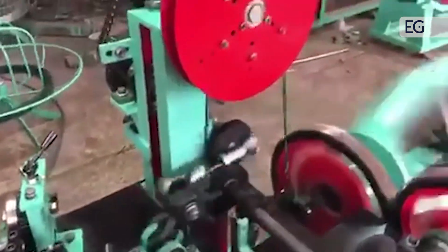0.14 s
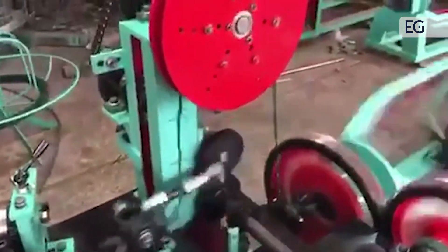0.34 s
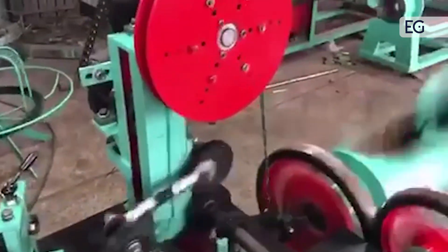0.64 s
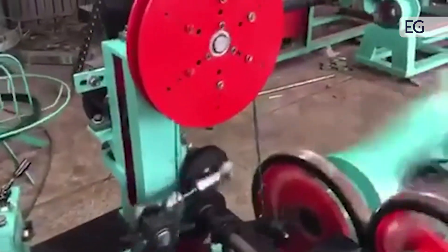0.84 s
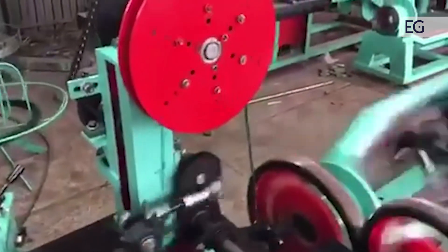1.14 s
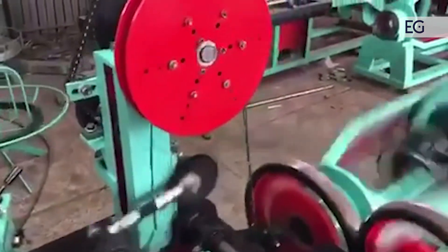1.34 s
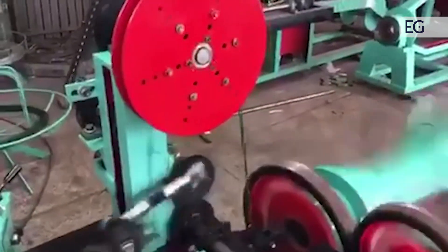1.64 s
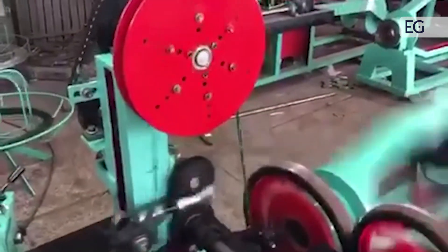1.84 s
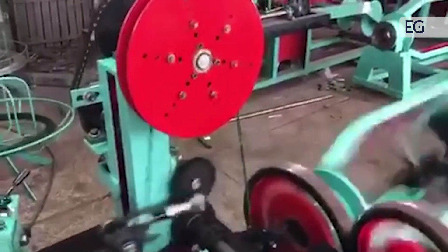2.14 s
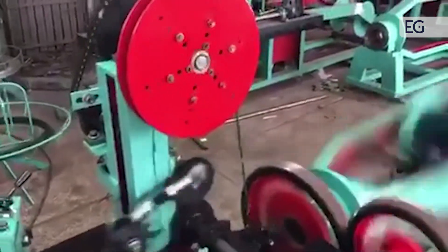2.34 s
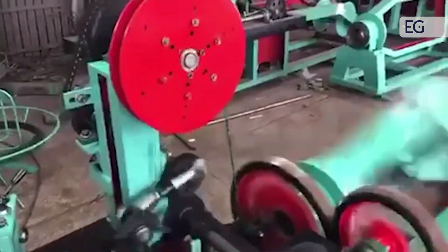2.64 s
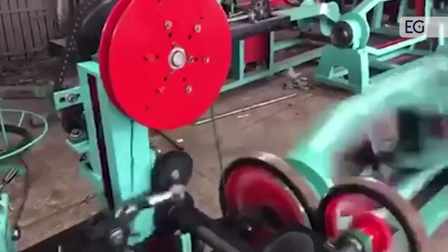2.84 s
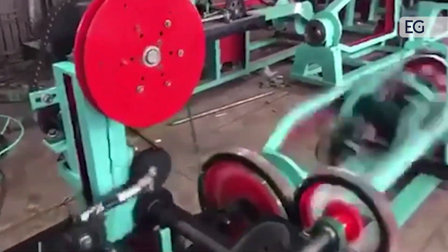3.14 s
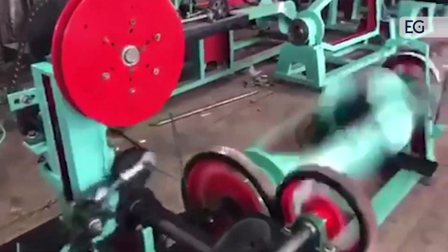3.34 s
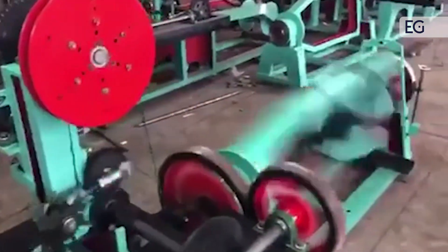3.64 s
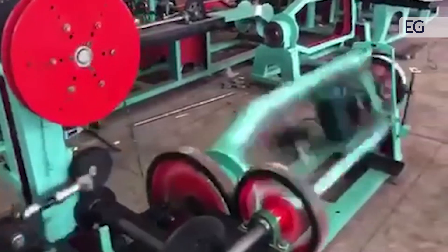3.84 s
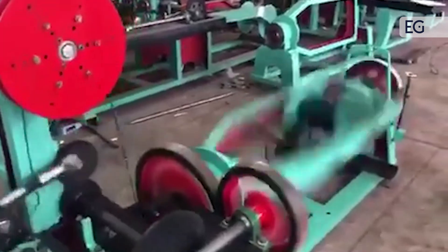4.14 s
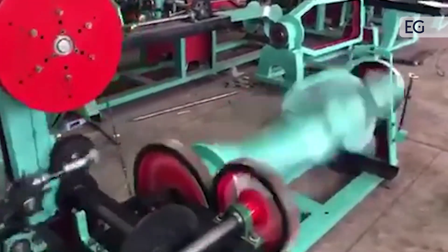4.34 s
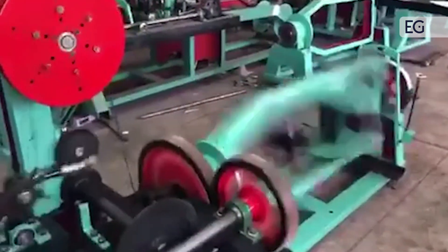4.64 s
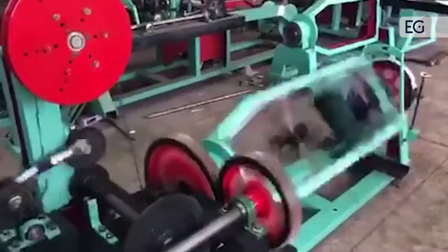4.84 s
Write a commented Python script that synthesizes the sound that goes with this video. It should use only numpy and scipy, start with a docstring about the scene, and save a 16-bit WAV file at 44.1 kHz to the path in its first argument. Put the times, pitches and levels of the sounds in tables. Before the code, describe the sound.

Continuous fast metallic clatter, heard on a phone a few metres off in a workshop: chain and gear rattle, scraping wire, knocks on sheet metal, and a regular thudding, crashing cutter stroke. Lever clanks are frequent for the first three seconds, then sparse. Thin wavering whines ring above a low motor hum; as the rattle softens with distance, a high steady whine stands out.

```python
"""In a workshop a wire machine runs at about three cycles a second, heard by a phone whose distance varies.
Driven resonance: roller rim modes and the motor hum waver as narrow-band noise, the upper modes in close pairs.
Shaped noise: dense random knocks make the rattle of frame, gears, chain, strand, barbs, guides and scraped wire;
its bands gap briefly, and short faint tones at random pitches sound during the gaps. Damped modes: guard knocks,
lever clanks and barb ticks decay as sines; each cutter stroke adds a bright noise crash and a low thud."""
import sys
import numpy as np
from scipy import signal
from scipy.fft import rfft, irfft, next_fast_len
from scipy.io import wavfile
from scipy.ndimage import uniform_filter1d

SR = 44100
rng = np.random.default_rng(int(sys.argv[2]) if len(sys.argv) > 2 else 0)


def to_wav(sig):
    """Store sig (one row per channel, or 1-D mono) as 16-bit WAV at the path in sys.argv[1].

    Samples outside -1..1 are clipped; the rate is SR.
    """
    pcm = np.clip(np.atleast_2d(sig), -1, 1) * 32767
    pcm = np.round(pcm).astype(np.int16)
    wavfile.write(sys.argv[1], SR, pcm.T)  # frames by channels


N = 219706
T = np.arange(N) / SR  # s
FFT_LENGTH = next_fast_len(N)
TOP_HZ = 10100  # upper limit of the phone

# path of the phone: start_s, distance_m
DISTANCE = [(0, 2.52), (.6, 2.1), (1.1, 2.79), (2.0, 2.53), (2.9, 2.5), (3.5, 4.16), (3.9, 4.23),
            (4.4, 4.16), (4.98, 3.7)]
NEAR_M = 2  # every near_db holds at this distance

# rim modes of the rollers, the second mode and then the first: pitch_hz, width_hz
LOW_MODES = [(2552, 18.0), (1258, 12.0)]
# upper rim modes in close pairs: pitch_hz, width_hz
UPPER_MODES = [(4169, 6), (4192.5, 4.85), (6002, 4.5), (6031, 5.5), (7936, 3.5), (7970, 7.9)]
# slow level of the second rim mode as the phone turns to the rollers: start_s, level_db
WHINE = [(0, -38.5), (.6, -37.5), (1.2, -41.5), (1.7, -32.5), (2.3, -28), (2.8, -26), (3.1, -15.5),
         (3.7, -20.5), (4.3, -21), (4.98, -19.5)]
# moments when that mode rings up or drops out: centre_s, change_db
THROBS = [(.054, 13.5), (.26, -7), (.471, 13), (.572, 7), (.753, 13), (.837, 5), (1.038, 8), (1.108, 14),
          (1.485, 9), (1.602, 9), (1.657, -17), (1.721, 11), (1.831, -14), (2.026, 9.5), (2.174, 7),
          (2.244, 9), (2.323, -4), (2.431, 6.5), (2.64, -44), (2.722, 10), (2.87, 4), (2.97, -14),
          (3.047, 3), (3.152, -2.5), (3.19, -14), (3.44, -16), (3.572, -14), (3.654, 4), (3.775, -15),
          (3.861, -22), (4.005, -8.5), (4.058, 0), (4.266, -14), (4.394, -16.5), (4.597, -7.5),
          (4.672, 6.5), (4.701, -15), (4.789, -9), (4.868, 8), (4.925, -11.5)]
THROB_S = 0.012
# steady ring of the first rim mode: near_db, loss_db (per doubling of distance)
FIRST_RING = (-32, 6.2)
# steady ring of each upper mode: near_db, loss_db (per doubling of distance)
UPPER_RING = [(-38.5, 0.5), (-35.5, 8.1), (-35, 19), (-44.5, 5.6), (-49.5, 12), (-51, 4.7)]
# swells of the first rim mode, added in power to its steady ring: top_s, level_db
FIRST_SWELLS = [(1.31, -28.5), (1.78, -25.5), (2.03, -41), (2.33, -28), (3.03, -29), (3.17, -31),
                (3.88, -38), (4.11, -32.5), (4.6, -32.5)]
# such swells for each upper mode, in order: top_s, level_db
UPPER_SWELLS = [
    [(.42, -39), (.67, -30.5), (1.24, -51), (2.41, -34), (3.02, -39), (3.4, -30), (4.57, -34),
     (4.72, -28.5)],
    [(.16, -29), (1.85, -25.5), (2.11, -26.5), (2.42, -30.5), (3.4, -36), (3.57, -36), (4.96, -46)],
    [(.15, -30.5), (.7, -33), (.3, -32.5), (.9, -35.5), (1.3, -35), (2.12, -35.5), (2.97, -50), (3.34, -41),
     (3.7, -40), (4.7, -42.5), (4.88, -40)],
    [(.02, -33.5), (.85, -49), (2.01, -38), (2.44, -43), (2.95, -38.5), (3.27, -39), (4.32, -48)],
    [(.02, -45), (1.33, -39), (2.94, -60), (3.98, -48), (4.32, -53), (4.7, -47.5)],
    [(.04, -41.5), (1.3, -55), (2.97, -49.5), (4.32, -59)],
]
SWELL_RISE_S, SWELL_FALL_S = 0.052, 0.044  # before any stretch
UPPER_SWELL_STRETCH = 1.42  # the narrow upper modes build and die more slowly
# exponent on the size of the swing: 0 steady, 1 free noise
LOW_FLUTTER, FIRST_FLUTTER, UPPER_FLUTTER = 0.25, 0.55, 0.28

HUM_HZ, HUM_WIDTH_HZ = 166, 10.2
# steady motor hum: near_db, loss_db (per doubling of distance)
HUM_LEVEL = (-39.5, 2.7)
# swells of the hum, added in power: top_s, level_db
HUM_SWELLS = [(.02, -38), (.44, -34), (.8, -39), (1.14, -40), (1.5, -38.5), (1.83, -35), (2.65, -37.5),
              (3.05, -35.5), (3.27, -39), (4.32, -32), (4.88, -34.5)]

# relative spectral density of the frame's drone: pitch_hz, level_db
BODY = [(25, -36), (45, -50), (60, -27), (90, -19.5), (130, -10), (200, -8), (350, -1), (500, -3),
        (650, -9.5), (900, -93)]
# the same for the gears: pitch_hz, level_db
GEARS = [(480, -28), (600, -4.5), (800, -0.5), (1150, -3), (1330, -3.5), (1420, -62)]
# the same for the chain links: pitch_hz, level_db
CHAIN = [(1260, -49), (1340, 1), (1600, -6), (2050, -0.5), (2300, -2), (2650, -0.5), (2780, -60)]
# the same for the wire strand: pitch_hz, level_db
STRAND = [(2700, -34), (2800, -10), (2900, 4), (3300, -5.5), (3650, 2.5), (3800, -37.5)]
# the same for the barbs: pitch_hz, level_db
BARBS = [(3600, -30.5), (3750, 2.5), (4100, 5), (5000, -2), (6150, 0.5), (6350, -40.5)]
# the same for the guides: pitch_hz, level_db
GUIDES = [(6150, -20), (6280, 0), (6420, -14), (6800, -12), (6950, 2), (7250, 2), (7400, -25)]
# the same for wire scraping over the guides: pitch_hz, level_db
SCRAPE = [(7150, -32), (7300, -0.5), (8000, 2), (9000, -1), (9600, -23), (9800, -43.5), (10100, -46)]
# resonances of the steel frame over those densities: pitch_hz, width_hz, gain_db
FRAME = [(246, 14, 5), (356, 16, 3), (384, 14, 8), (414, 12, 5), (451, 12, 5), (925, 20, 4), (1039, 40, 4),
         (1232, 55, 12), (1800, 60, 5), (2553, 66, 7), (2995, 35, 6), (3125, 35, 11), (4180, 60, 9),
         (6010, 50, 9)]
# rms level of each rattling part: near_db, loss_db (per doubling of distance), shake_db (at a typical stroke)
PARTS = dict(body=(-26, 4.52, 2.4), gears=(-29, 4.3, 2.5), chain=(-29, 5.2, 4.1), strand=(-38, 5.6, 2.1),
         barbs=(-36, 5.7, 4), guides=(-52.5, 5.2, 9.2), scrape=(-44, 5, 2.1))
SHAKE_S, SHAKE_LAG_S = 0.033, 0.0051
# brief gaps in bands of the rattle, with typical falls that scatter by band: centre_s, half_length_s,
# gears_and_chain_db, strand_barbs_and_guides_db, scrape_db
GAPS = [(.07, .035, 10, 30, 14), (.265, .03, 12, 24, 6), (.405, .03, 14, 24, 8), (.615, .03, 14, 22, 5),
        (.785, .05, 22, 30, 8), (.965, .03, 14, 20, 14), (1.135, .048, 18, 28, 6), (1.32, .03, 22, 22, 6),
        (1.478, .03, 10, 32, 22), (1.66, .03, 26, 24, 18), (1.84, .05, 16, 34, 10), (2.01, .035, 16, 28, 6),
        (2.17, .045, 12, 30, 26), (2.355, .03, 14, 22, 10), (2.53, .055, 24, 32, 16),
        (2.73, .045, 20, 30, 20), (2.88, .042, 12, 28, 14), (3.07, .04, 12, 20, 8), (3.2, .025, 8, 16, 6),
        (3.39, .06, 5, 18, 8), (3.55, .03, 10, 12, 8), (3.74, .03, 6, 10, 14), (3.98, .025, 7, 3, 2),
        (4.115, .045, 11, 26, 16), (4.26, .03, 17, 14, 5), (4.48, .05, 4, 24, 12), (4.6, .03, 14, 8, 6),
        (4.77, .05, 6, 26, 12), (4.955, .03, 18, 30, 8)]
# chance that a band of each part keeps its level through a gap: probability
KEEPS_LEVEL = dict(gears=.3, chain=.2, strand=.03, barbs=.25, guides=.25, scrape=.45)
# longer drops in level of the 2.7-3.8 kHz noise: centre_s, fall_db
STRAND_DROPS = [(3.05, 10), (3.36, 22), (3.48, 22), (3.6, 22), (4.14, 14), (4.53, 12), (4.8, 14),
                (4.92, 14)]
STRAND_DROP_S = 0.07

# modes of the sheet guard: pitch_hz, t60_s
GUARD = [(760, .06), (930, .07), (1090, .07), (1480, .05), (1790, .06), (1990, .03), (2260, .04)]
KNOCKS_PER_S = 45
# rms level of the guard knocks: near_db, loss_db (per doubling of distance)
KNOCK_LEVEL = (-36.5, 4.1)

# single clanks of the lever, before a common trim: start_s, level_db
CLANKS = [(0.0343, -12), (.111, -14), (.218, -17), (0.6915, -11), (0.8093, -10), (.92, -30), (1.089, -15),
          (1.1478, -13), (1.446, -13), (1.6701, -19), (1.8781, -14), (2.031, -15), (2.174, -16),
          (2.291, -10.5), (2.401, -16), (2.564, -10), (2.6736, -7), (2.846, -9.5), (2.909, -6),
          (2.986, -10), (3.2256, -13), (3.9287, -16), (4.2852, -20), (4.6628, -20.5), (4.779, -20)]
# modes of the lever: pitch_hz, level_db, t60_s
LEVER = [(1810, -1.5, 0.04), (2073, -1.5, 0.05)]
CLANK_TRIM_DB = -5.0

TONE_LOW_HZ, TONE_HIGH_HZ, TONE_T60_S, TONE_LAG_S = 650, 5800, 0.12, 0.02
# upper limit of a faint tone at 1 kHz: near_db, loss_db (per doubling of distance), tilt_db (lost per octave)
TONE_LEVEL = (-24, 3.9, 3.1)

# cutter strokes, before the two gains below: stroke_s, crash_db, thud_db, shake (1 = typical)
CUTS = [(0.1067, -34, -35.5, 1.4), (0.465, -24, -39, 0.72), (0.818, -29, -43, 1.1), (1.148, -26.5, -35, 2),
        (1.5113, -29.5, -36, 0.48), (1.887, -54, -39, 1.2), (2.23, -42, -38, 0.99),
        (2.556, -31, -60.5, 1.2), (2.906, -54, -39, 1.2), (3.249, -25, -41.5, 0.57),
        (3.6066, -35, -49, 0.67), (3.9513, -32, -38, 0.91), (4.3044, -40, -37.5, 0.79),
        (4.64, -31, -47, 0.42)]
CRASH_GAIN_DB, THUD_GAIN_DB = 10.0, 6.0
# relative spectral density of the crash: pitch_hz, level_db
CRASH = [(500, -23), (1300, -5), (2300, -5), (2700, -22), (3600, -22), (4000, -3), (5500, -5), (6600, -12),
         (7400, -2), (8200, 4.5), (9400, -10), (9700, -40)]
STROKE_LEAD_S, STROKE_RISE_S = 0.022, 0.022

# ticks of a barb on a guide, before a common trim: start_s, level_db, pitch_hz
TICKS = [(.469, -35, 4650), (1.26, -30, 3170), (2.57, -29, 4840), (.611, -34, 7460), (1.148, -29, 7320),
         (2.554, -24, 8030), (3.066, -32, 8800), (2.715, -24, 4830), (2.849, -35, 4400), (2.904, -25, 5130),
         (3.957, -24, 5050), (4.215, -26, 3380), (4.309, -28, 5140)]
TICK_TRIM_DB, TICK_T60_S, TICK_RISE_S = -2.5, 0.04, 0.003


def undb(db):
    """Decibel law: amplitude ratio of a level in dB."""
    return 10 ** (np.asarray(db) / 20)


def unit(x):
    """Normalisation: scale a signal to an rms of 1."""
    return x / np.sqrt(np.mean(x ** 2))


def columns(table):
    """Linear interpolation: each column after the time, drawn out over all samples."""
    s, *values = np.transpose(table)
    return [np.interp(T, s, c) for c in values]


def bumps(table, width_s, lag_s=0):
    """Superposition: a Gaussian bell at each row's time, summed for every column."""
    s, *values = np.transpose(table)
    return np.array(values) @ np.exp(-((T - lag_s - s[:, None]) / width_s) ** 2)


def heard(near_db, loss_db):
    """Distance law: a part loses a fixed number of dB per doubling of distance."""
    return undb(near_db - loss_db * np.log2(columns(DISTANCE)[0] / NEAR_M))


def swelling(steady, swells, stretch=1):
    """Power addition: a steady level joined by bell-shaped swells, slightly longer up than down."""
    s, db = np.transpose(swells)
    off_s = (T - s[:, None]) / stretch
    bells = np.exp(-(off_s / np.where(off_s < 0, SWELL_RISE_S, SWELL_FALL_S)) ** 2)
    swell_power = (undb(db)[:, None] ** 2 * bells).sum(axis=0)
    return np.sqrt(heard(*steady) ** 2 + swell_power)


def ring(hz, width_hz, flutter):
    """Random excitation of a resonance: phase wanders and size flutters as low-passed complex noise."""
    pole = np.exp(-2 * np.pi * width_hz / SR)
    swing = rng.standard_normal(N + SR) + 1j * rng.standard_normal(N + SR)  # a second's run-up
    swing = signal.lfilter([1], np.poly([pole, pole]), swing)
    swing = swing * (np.abs(swing) + 1e-9) ** (np.clip(flutter, 0, 1) - 1)
    swing = signal.lfilter([1], np.poly([pole ** 4, pole ** 4]), swing)  # smooths the compressed swing
    return unit((swing[SR:] * np.exp(2j * np.pi * hz * T)).real)


def rollers():
    """Modal superposition: thick steel rollers ring on their rim modes, each at its own level."""
    whine = undb(columns(WHINE)[0] + bumps(THROBS, THROB_S)[0])
    levels = whine, swelling(FIRST_RING, FIRST_SWELLS)
    low = sum(gain * ring(hz, width_hz, flutter)
              for (hz, width_hz), gain, flutter in zip(LOW_MODES, levels, (LOW_FLUTTER, FIRST_FLUTTER)))
    high = sum(swelling(steady, swells, UPPER_SWELL_STRETCH) * ring(hz, width_hz, UPPER_FLUTTER)
               for (hz, width_hz), steady, swells in zip(UPPER_MODES, UPPER_RING, UPPER_SWELLS))
    return low + high


def motor():
    """Narrow-band noise: a wavering motor hum carried through the frame."""
    return swelling(HUM_LEVEL, HUM_SWELLS) * ring(HUM_HZ, HUM_WIDTH_HZ, flutter=0.45)


def walk(rate):
    """Random modulation: levels held 1 / rate s and smoothed twice, with an rms of 1."""
    hold = int(SR / rate)
    steps = np.repeat(rng.standard_normal(N // hold + 1), hold)
    return unit(uniform_filter1d(uniform_filter1d(steps, hold), hold)[:N])


def gap_fall(column, part, shift_s=0.013, scatter=0.4):
    """Amplitude modulation: fall in dB of one band at the gaps, with random depth and timing."""
    s, half_s, *fall_db = np.transpose(GAPS)
    size, shift = rng.standard_normal((len(s), 2)).T
    falls = rng.random(len(s)) > KEEPS_LEVEL[part]
    depth_db = fall_db[column] * falls * np.maximum(1 + scatter * size, 0)
    coarse_s = T[::128]
    dips = np.exp(-((coarse_s - (s + shift_s * shift)[:, None]) / half_s[:, None]) ** 4)
    return np.interp(T, coarse_s, depth_db @ dips)


def grains(rate, scatter_db, tail_s):
    """Shot noise: dense random knocks of uneven size, each a short burst, over a faint steady noise."""
    blows = (rng.random(N) < rate / SR) * undb(scatter_db * rng.standard_normal(N))
    power = signal.lfilter([1], [1, -np.exp(-1 / (tail_s * SR))], blows ** 2)
    return np.sqrt(power / power.mean() + 0.021) * rng.standard_normal(N)


def colour(x, shape, peaks=(), gaps=None, patchy_db=0, count=1):
    """Spectral filtering: shape and resonances, in count bands that each flicker and gap alone; rms 1."""
    hz = np.maximum(np.fft.rfftfreq(FFT_LENGTH, 1 / SR), 1)
    points_hz, points_db = np.transpose(shape)
    gain = undb(np.interp(np.log(hz), np.log(points_hz), points_db))
    for centre_hz, width_hz, db in peaks:
        gain = gain * undb(db / (1 + (2 * (hz - centre_hz) / width_hz) ** 2))
    # bands of equal width in log frequency
    place = np.log(hz / points_hz[0]) / np.log(points_hz[-1] / points_hz[0])
    band = np.clip(count * place, 0, count - 1).astype(int)
    spectrum = rfft(x, FFT_LENGTH) * gain
    out = np.zeros(N)
    for k in range(count):
        sound = irfft(spectrum * (band == k), FFT_LENGTH)[:N]
        fall_db = 0 if gaps is None else gap_fall(*gaps)
        out += sound * undb(patchy_db * walk(18) - fall_db)
    return unit(out)


def rattle():
    """Resonant filtering of shot noise: frame, gears, chain, strand, barbs, guides and scraped wire."""
    parts = dict(
        body=colour(grains(900, 0.5, 0.008), BODY, FRAME, patchy_db=1.17, count=6),
        gears=colour(grains(720, 2.3, 0.017), GEARS, FRAME, (0, "gears"), patchy_db=2, count=9),
        chain=colour(grains(400, 3.25, 0.0043), CHAIN, FRAME, (0, "chain"), patchy_db=3, count=11),
        strand=colour(grains(700, 4, 0.005), STRAND, FRAME, (1, "strand"), patchy_db=6, count=6),
        barbs=colour(grains(700, 5.2, 0.0049), BARBS, FRAME, (1, "barbs"), patchy_db=4, count=10),
        guides=colour(grains(630, 3.6, 0.003), GUIDES, (), (1, "guides"), patchy_db=6, count=4),
        scrape=colour(grains(630, 3.6, 0.003), SCRAPE, (), (2, "scrape"), patchy_db=3.5, count=7))
    parts["strand"] = parts["strand"] * undb(-bumps(STRAND_DROPS, STRAND_DROP_S)[0])
    shake = bumps(CUTS, SHAKE_S, SHAKE_LAG_S)[-1]  # each stroke shakes the loose parts
    out = np.zeros(N)
    for name, (near_db, loss_db, shake_db) in PARTS.items():
        out += parts[name] * heard(near_db + shake_db * shake, loss_db)
    return out


def knocks(scatter_db=6.5):
    """Impulse response: links knock on a sheet guard, each blow ringing its modes in another mix."""
    at = np.flatnonzero(rng.random(N) < KNOCKS_PER_S / SR)
    size_db = scatter_db * np.clip(rng.standard_normal(len(at)), -2, 1)
    size = undb(size_db - gap_fall(0, "chain")[at])
    out = np.zeros(N)
    for hz, t60 in GUARD:
        blows = np.zeros(N)
        blows[at] = size * rng.standard_normal(len(at))
        pole = np.exp(2j * np.pi * hz / SR - np.log(1000) / (t60 * SR))
        mode = signal.lfilter([1], np.poly([pole, pole.conjugate()]).real, blows)
        out += mode * np.sin(2 * np.pi * hz / SR)  # evens out the gain between pitches
    return heard(*KNOCK_LEVEL) * unit(out)


def lever(rise_s=0.002):
    """Free damped vibration: each clank rings two modes of the lever that die exponentially."""
    out = np.zeros(N)
    phases = 2 * np.pi * rng.random((len(CLANKS), len(LEVER)))
    for (s, db), phase in zip(CLANKS, phases):
        age = np.maximum(T - s, 0)
        rise = 1 - np.exp(-age / rise_s)
        for (hz, mode_db, t60), p in zip(LEVER, phase):
            decay = undb(db + mode_db + CLANK_TRIM_DB - 60 * age / t60)
            out += decay * rise * np.sin(2 * np.pi * hz * age + p)
    return out


def faint_tones(count=11, rise_s=0.012):
    """Exponential decay: short faint tones at random pitches start during the gaps."""
    near_db, loss_db, tilt_db = TONE_LEVEL
    out = np.zeros(N)
    draws = rng.random((len(GAPS), 3, count, 1))
    for (s, half_s, *_), (pitch, late, size) in zip(GAPS, draws):
        start = max(int((s - half_s) * SR), 0)
        span = slice(start, int((s + half_s + 2 * TONE_T60_S) * SR))
        hz = TONE_LOW_HZ * (TONE_HIGH_HZ / TONE_LOW_HZ) ** pitch
        age = np.maximum(T[span] - (s - half_s + TONE_LAG_S + 2 * half_s * late), 0)
        decay = undb(-tilt_db * np.log2(hz / 1000) - 10 * size - 60 * age / TONE_T60_S)
        rise = 1 - np.exp(-(age / rise_s) ** 2)
        out[span] += (decay * rise * np.sin(2 * np.pi * hz * age)).sum(axis=0)
    return heard(near_db, loss_db) * out


def cutter(crash_t60=0.14, thud_t60=0.29, thud_hz=112, deep_hz=72, deep_db=-9):
    """Impact: each stroke gives a blunt bright noise crash and a two-mode thud in the bed plate."""
    crash, thud = np.zeros(N), np.zeros(N)
    for s, crash_db, thud_db, _ in CUTS:
        age = np.maximum(T - s + STROKE_LEAD_S, 0)
        rise = 1 - np.exp(-(age / STROKE_RISE_S) ** 2)
        crash += undb(crash_db - 60 * age / crash_t60) * rise
        tone = np.sin(2 * np.pi * thud_hz * age) + undb(deep_db) * np.sin(2 * np.pi * deep_hz * age)
        thud += undb(thud_db - 60 * age / thud_t60) * rise * tone
    clatter = colour(grains(500, 4, 0.004), CRASH, patchy_db=6, count=24)
    return undb(CRASH_GAIN_DB) * crash * clatter + undb(THUD_GAIN_DB) * thud


def ticks(spread=0.046):
    """Free damped vibration: each barb tick rings three short modes near its pitch."""
    out = np.zeros(N)
    for (s, db, hz), off in zip(TICKS, rng.standard_normal((len(TICKS), 3))):
        age = np.maximum(T - s, 0)
        envelope = undb(db + TICK_TRIM_DB - 60 * age / TICK_T60_S) * (1 - np.exp(-age / TICK_RISE_S))
        modes_hz = hz * (1 + spread * off)[:, None]
        out += envelope * np.sin(2 * np.pi * modes_hz * age).sum(axis=0)
    return out


def scene():
    """Linear superposition: all layers sum into one channel."""
    steady = rollers() + motor() + rattle()
    short = knocks() + lever() + faint_tones() + cutter() + ticks()
    return (steady + short)[None]


def record(dry):
    """Band limiting: the phone cuts the top with a steep elliptic low-pass."""
    return signal.sosfilt(signal.ellip(12, 0.2, 90, TOP_HZ, fs=SR, output="sos"), dry)


dry = scene()
out = record(dry)
to_wav(out)
```